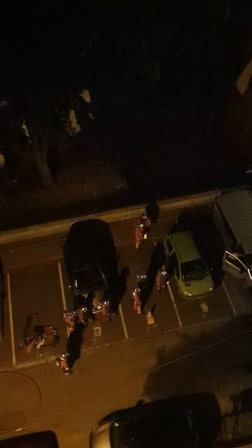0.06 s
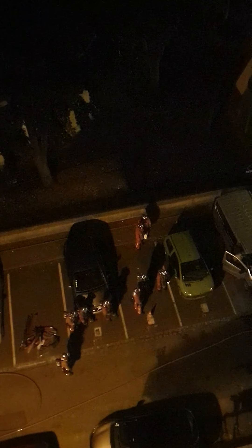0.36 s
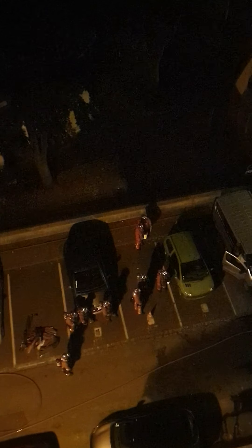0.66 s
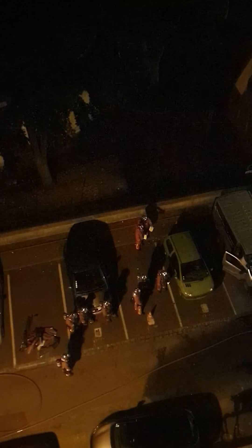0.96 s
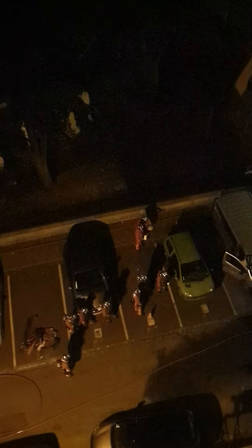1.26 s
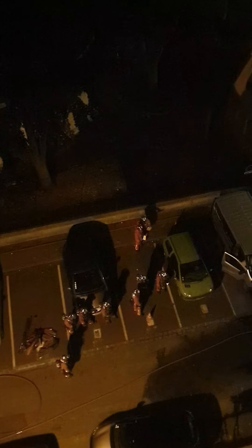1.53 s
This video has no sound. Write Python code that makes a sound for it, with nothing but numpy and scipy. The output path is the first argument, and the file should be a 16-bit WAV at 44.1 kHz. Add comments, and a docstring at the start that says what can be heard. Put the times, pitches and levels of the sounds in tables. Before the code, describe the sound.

Six loud blows on a burnt-out car's steel shell echo between buildings, with small clinks of debris over a low town hum.

```python
"""Six blows on the shell of a burnt-out car, at night, the microphone at a window high above the street.
Three dull, heavy ones make whole panels boom; three hard ones crash on bare steel. Each time the steel
buckles and rings and charred paint cracks off; loose bits clink in between. Every blow rolls around
the house fronts and comes back from all sides, over the low hum of the town."""
import sys
import numpy as np
from scipy import signal
from scipy.fft import rfft, irfft, next_fast_len
from scipy.io import wavfile
from scipy.ndimage import map_coordinates

SR = 44100
rng = np.random.default_rng(int(sys.argv[2]) if len(sys.argv) > 2 else 0)


def store_wav(level_fs):
    """Save 16-bit WAV to argv[1]."""
    pcm = np.round(np.clip(np.atleast_2d(level_fs), -1, 1) * 32767)
    wavfile.write(sys.argv[1], SR, pcm.T.astype(np.int16))


N = 246519

# Blows and rebounds. Each row: start in seconds, level in dB, hardness from 0 to 1, boom pitch in Hz,
# then hollowness, treble and paint grit in dB.
BLOWS = [(0.6232, 23, 0.1, 122, 1, 1.5, -64), (0.634, 22.5, 0.24, 206, 3.5, -15, -70),
         (1.145, 22, 0.03, 113, 4.5, 4, -58), (1.21, 18, 0.09, 218, -5, -2, -61),
         (1.717, 21, 0.15, 98, 3.5, 3.5, -53.5), (1.798, 14.5, 0.01, 120, -1.5, 1.5, -65),
         (3.221, 26.5, 0.97, 62, -2, -2, -54), (4.1799, 22, 0.8, 156, -2.5, 1, -49),
         (4.205, 23, 0.8, 83.5, -2.5, -4.5, -42.5), (5.1545, 25, 0.98, 208.6, 5.5, 9, -43.5)]
# Loose bits. Each row: start in seconds, level in dB, treble in dB.
BITS = [(0.468, -14, 23), (1.013, -6.5, 14.5), (1.06, -18, 25), (1.638, -32, 9), (3.463, -10, -6),
        (3.702, -17, 23), (4.85, -1.5, 7), (5.414, -10, 6), (5.532, -8, 25), (5.555, 0, 9)]
# The shell's tone under a soft and a hard contact. Each row: frequency in Hz, gain in dB.
SOFT_TONE = [(25, -41), (55, 7.5), (110, 3.5), (210, 8), (340, 1.5), (700, 3), (1200, 1.5), (1750, -4.5),
             (2300, -16), (3200, -18), (4500, -31), (7000, -39), (10500, -36.5), (14500, -63)]
HARD_TONE = [(25, -35), (65, 7.5), (115, 4.5), (190, 7), (280, -1), (390, 0), (520, -3.5), (750, 0.5),
             (1130, 3.5), (1480, 1.5), (1850, 1), (2300, -3.5), (3200, -5.5), (4300, -17.5), (7500, -34),
             (11000, -37), (14500, -79)]
# Where a contact's treble and hollowness act. Each row: frequency in Hz, share of the dB setting.
TREBLE_SHARE = [(2500, 0.075), (5500, 0.88)]
HOLLOW_SHARE = [(220, 0.017), (320, 0.45), (480, 0.55), (700, 0)]
# Resonances of the steel. Each row: frequency in Hz, relative level in dB, T60 in seconds.
PANEL_MODES = [(129, -26, 0.15), (209, 8.5, 0.44), (302, -3, 0.64), (410.8, 5, 0.34), (494.5, 3, 0.21),
               (683.7, 9.5, 0.19), (747.4, 9, 0.23), (966, -10, 0.33), (1138, 7, 0.029), (1262, 6.5, 0.2),
               (1420, -15, 0.15), (1784, 11, 0.23), (1880, 6.5, 0.15), (2490, 7, 0.24), (2670, -6, 0.058),
               (2700, 3, 0.11), (2904, 12.5, 0.13), (2883, 10.5, 0.12), (3204, 9.5, 0.12)]
# The street's reverberation. Each row: frequency in Hz, T60 in seconds.
STREET_T60 = [(60, 2.39), (170, 1.18), (500, 1.47), (1000, 1.49), (2500, 1.465), (5000, 1.42),
              (12000, 1.18)]
# Its tone up at the window. Each row: frequency in Hz, gain in dB.
STREET_TONE = [(50, -1.5), (150, 2), (260, 0.5), (500, -3), (780, -0.5), (1100, -3.5), (1500, -1),
               (2200, 0), (3000, -1), (4000, 1.5), (7000, 1.5), (12000, -9.5)]
# Echoes off the house fronts. Each row: delay in seconds, level in dB.
FACADE_ECHOES = [(0.06, -15), (0.09, -17.5), (0.211, -17.5), (.26, -21.5)]
# Balance at the two microphone ports, for sound from the car and from all around.
# Each row: frequency in Hz, left minus right in dB.
CAR_BALANCE = [(150, 2), (450, 3.5), (800, 6), (1100, 33), (1500, -2.5), (1800, -25), (2200, 18), (2600, 8),
               (3250, 56), (3650, 17), (4400, -25.5), (5200, 13), (7600, -24), (9500, -2), (13000, -36)]
DIFFUSE_BALANCE = [(150, 1.5), (450, 0), (620, 8), (850, 0), (1150, 8), (1800, -1), (2400, 7.5),
                   (3300, 4.5), (4500, 3), (6300, -11), (7600, -21), (9500, -5), (13000, 9)]
# The car's sound at the ports. Each row: frequency in Hz, phase lead of the left in radians.
CAR_PHASE = [(850, .5), (1150, -1.2), (1550, -2.5), (1850, -6), (2200, -4), (2550, -12), (3100, -18.5),
             (4200, -14), (5500, -19.5), (12000, -26.5)]
# Diffuse sound at the ports. Each row: frequency in Hz, left-right correlation.
DIFFUSE_LIKENESS = [(150, 0.99), (330, 0.9), (520, 0.47), (750, 0.84), (1050, 0.2), (1500, -0.27),
                    (2000, 0.37), (2600, -0.12), (5000, 0.031)]
# The town's spectrum. Each row: frequency in Hz, relative level in dB.
HUM_TONE = [(25, -15), (45, -1.5), (70, 0), (130, -1), (200, -8.5), (290, -5.5), (370, -15), (500, -9),
            (700, -15), (1200, -12), (1800, -17), (2600, -24.5), (3200, -23.5), (4000, -31.5),
            (7000, -41.5), (11000, -39.5), (12500, -50), (14500, -66)]
# Its loudness. Each row: time in seconds, level in dB.
HUM_LEVEL = [(0, -43.5), (2.3, -48), (5.59, -48.5)]

# Hardness shapes a blow; each pair runs from the softest contact to the hardest.
RISE_S, CRUNCH_T60_S = (0.0065, 0.0045), (0.61, 0.19)  # a soft one builds slower and buckles for longer
BOOM_DB, SNAP_DB = (-26.5, -44), (-67, -91)  # and pushes the whole panel; relative to the blow's level
RING_DB, ECHO_DB = (-0.5, 1.5), (0, -4)  # a hard one rings more and has less echo for its level


def blows(boom_spread_db=-11, grit_spread_db=-8):
    """The tool strikes the car down in the street: the direct sound and the house fronts' answer."""
    direct, echo = np.zeros(N), np.zeros((2, N))
    pairs = (RISE_S, CRUNCH_T60_S, BOOM_DB, RING_DB, SNAP_DB, ECHO_DB)
    for start, db, hardness, boom_hz, hollow_db, treble_db, grit_db in BLOWS:
        rise, t60, boom_db, ring_db, snap_db, echo_db = (np.interp(hardness, [0, 1], p) for p in pairs)
        crash, spread = amp(db) * shell(hardness, ring_db, treble_db, rise, t60, hollow_db)
        thud = amp(db + boom_db) * boom(boom_hz)
        flakes = amp(grit_db) * paint_grit()
        snap = amp(db + snap_db) * paint_snap()
        for sound in (crash, thud, flakes, snap):
            add(direct, start, sound)
        outward = spread + amp(boom_spread_db) * thud + amp(grit_spread_db) * flakes[:len(thud)]
        add(echo, start + rise, amp(echo_db) * street(outward))
    return direct, echo


def shell(hardness, ring_db, treble_db, rise, t60, hollow_db=0, spread_ring_db=-8):
    """What the struck body sends up to the window and out over the street; harder is brighter."""
    def tone_db(hz):
        contact = (1 - hardness) * along(SOFT_TONE, hz) + hardness * along(HARD_TONE, hz)
        return contact + treble_db * along(TREBLE_SHARE, hz) + hollow_db * along(HOLLOW_SHARE, hz)

    ring = amp(ring_db) * panel_ring(rise)
    direct = crunch(rise, t60) + ring
    # summed over all directions the slips even out into one smooth pulse
    spread = signal.unit_impulse(len(ring)) + amp(spread_ring_db) * ring
    return np.array([coloured(direct, tone_db), coloured(spread, tone_db)])


def crunch(rise, t60, grain_db=-0.5, touch=0.47, low_hz=140):
    """The tool touches, then the steel buckles in a burst of tiny slips, too small to move much bass."""
    t = np.arange(SR // 3) / SR
    onset = 1 + touch - np.exp(-(t / rise) ** 2)
    buckling = onset * amp(grain_db * wobble(691, len(t)) - 60 * t / t60)
    slips = rng.standard_normal(len(t)) * buckling
    return signal.lfilter(*signal.butter(1, low_hz, "high", fs=SR), slips / np.linalg.norm(slips))


def panel_ring(rise):
    """The panels ring, a little differently for every spot that is struck."""
    t = np.arange(SR // 3) / SR
    ring = np.zeros(len(t))
    for hz, db, t60 in PANEL_MODES:
        strength, detune, phase = rng.uniform(-1.1, 1, 3)
        decay = np.log(1000) / t60
        peak = amp(db + 2 * strength) * 2 * decay / SR  # from resonance height to starting amplitude
        pitch = hz * (1 + 0.0084 * detune)
        ring += peak * np.exp(-decay * t) * np.sin(2 * np.pi * (pitch * t + phase))
    return ring * (1 - np.exp(-(t / rise) ** 2))


def boom(hz, t60=0.069, give_s=0.00464, attack_s=0.0015):
    """A whole panel gives way just after the contact and swings a few times."""
    t = np.maximum(np.arange(SR // 3) / SR - give_s, 0)
    return np.sin(2 * np.pi * hz * t) * amp(-60 * t / t60) * (1 - np.exp(-t / attack_s))


def paint_grit(t60=0.3, grain_db=4, flakes_per_s=350, fall_s=0.39, fall_spread_s=0.11, patter_db=-25):
    """Charred paint cracks off at the contact; single flakes tick down a moment later."""
    t = np.arange(2 * SR // 3) / SR
    crackle = rng.standard_normal(len(t)) * amp(grain_db * wobble(302, len(t)))
    burst = unit(crackle) * amp(-60 * t / t60)
    ticks = unit(rng.standard_normal(len(t)) * (rng.random(len(t)) < flakes_per_s / SR))
    patter = ticks * amp(patter_db) * np.exp(-((t - fall_s) / fall_spread_s) ** 2)
    return 2 * bandpass(burst + patter, low_hz=8500, high_hz=12000)


def paint_snap(t60=0.057):
    """The brittle paint crust breaks at once as the panel gives way under the tool."""
    t = np.arange(SR // 5) / SR
    crack = bandpass(rng.standard_normal(len(t)), low_hz=5000, high_hz=11500)
    return unit(crack) * amp(-60 * t / t60)


def loose_bits(echo_db=-5):
    """Small pieces of the wreck drop and clink: the direct sound and the house fronts' answer."""
    paths = np.zeros((2, N))
    for start, db, treble_db in BITS:
        clink = shell(hardness=0.64, ring_db=1.0, treble_db=treble_db, rise=0.0028, t60=0.18)
        add(paths, start, amp(db) * clink)
    direct, spread = paths
    return direct, amp(echo_db) * street(spread)[:, :N]


def from_car(x):
    """Straight from car to microphone: long waves reach both ports together, short ones the right first."""
    def response(hz):
        left_lead = along(CAR_PHASE, hz) * np.minimum(hz / 800, 1) ** 2
        return port_gains(CAR_BALANCE, hz) * np.exp([[0.5j], [-0.5j]] * left_lead)

    return filtered(x, response)


def street(x, build_s=0.0058, scatter_s=0.044):
    """The house fronts answer: a few smeared echoes within a long tail, as two unrelated signals."""
    size = 4 * SR // 3
    t = np.arange(size) / SR
    hz, frame_s, spectra = signal.stft(rng.standard_normal((2, size)), SR, nperseg=256)
    decay = amp(-60 * frame_s / along(STREET_T60, hz)[:, None])
    tail = signal.istft(spectra * decay, SR, nperseg=256)[1][:, :size]
    tail *= (1 - np.exp(-t / build_s)) * np.sqrt(14 / SR)
    echo_power = sum(amp(db) ** 2 * (t > delay) * np.exp(-abs(t - delay) / scatter_s)
                     for delay, db in FACADE_ECHOES)
    tail += rng.standard_normal((2, size)) * np.sqrt(echo_power / (scatter_s * SR))
    return signal.fftconvolve(x[None], tail, axes=1)


def from_all_around(pair):
    """Two unrelated signals as diffuse sound at the microphone: alike in the bass, not in the treble."""
    def mid_side_gains(hz):
        angle = np.arccos(np.clip(along(DIFFUSE_LIKENESS, hz), -1, 1)) / 2
        return np.array([np.cos(angle), np.sin(angle)])

    mid, side = filtered(pair, mid_side_gains)
    return filtered(np.array([mid + side, mid - side]), lambda hz: port_gains(DIFFUSE_BALANCE, hz))


def town_hum(bass_hz=250, bass_waver_db=2.4, upper_waver_db=0.077):
    """The hum of the streets reaches the window from all sides; its bass wavers."""
    air = from_all_around(rng.standard_normal((2, N)))
    air = unit(filtered(air, lambda hz: amp(along(HUM_TONE, hz))))
    bass = filtered(air, lambda hz: 1 / (1 + (hz / bass_hz) ** 4))
    upper = (air - bass) * amp(upper_waver_db * wobble(5.6, N))
    bass *= amp(bass_waver_db * wobble(8.7, N))
    level_db = np.interp(np.arange(N) / SR, *np.transpose(HUM_LEVEL))
    return amp(level_db) * (upper + bass)


def port_gains(balance, hz):
    """Left and right gains that share the power between the microphone ports."""
    ratio = amp(along(balance, hz))
    return np.array([ratio, np.ones_like(ratio)]) * np.sqrt(2 / (1 + ratio ** 2))


def amp(db):
    """Decibels to gain."""
    return np.exp(np.asarray(db) * (np.log(10) / 20))


def unit(x):
    """x at rms 1."""
    return x / np.sqrt(np.mean(x ** 2) + 1e-20)


def along(points, hz):
    """(Hz, value) points read on a log axis."""
    knots_hz, values = np.transpose(points)
    return np.interp(np.log(hz + 1), np.log(knots_hz + 1), values)


def wobble(rate, size):
    """A smooth random curve, rate knots a second."""
    knots = rng.standard_normal(size // 20 + 4)
    return map_coordinates(knots, [np.arange(size) * rate / SR], mode="mirror")


def bandpass(x, low_hz, high_hz):
    """x through a Butterworth band filter."""
    return signal.sosfilt(signal.butter(2, [low_hz, high_hz], "band", fs=SR, output="sos"), x)


def filtered(x, response):
    """x with its spectrum multiplied by a function of frequency."""
    size = x.shape[-1]
    padded = next_fast_len(size + SR // 10, real=True)
    return irfft(rfft(x, padded) * response(np.fft.rfftfreq(padded, 1 / SR)), padded)[..., :size]


def coloured(x, level_db, size=4096):
    """x through a causal filter whose gain in dB is a function of frequency."""
    cepstrum = irfft(np.log(amp(level_db(np.fft.rfftfreq(size, 1 / SR)))))
    cepstrum[1:size // 2] *= 2  # folding gives minimum phase
    cepstrum[size // 2 + 1:] = 0
    return signal.fftconvolve(x, irfft(np.exp(rfft(cepstrum))))[:len(x)]


def add(track, s, sound):
    """Mix a sound into the track at s seconds."""
    start = round(s * SR)
    track[..., start:start + sound.shape[-1]] += sound[..., :N - start]


def scene():
    """At the window: the wreck below, its echoes from all around, and the town behind."""
    blow, blow_echo = blows()
    clink, clink_echo = loose_bits()
    echo = filtered(from_all_around(blow_echo + clink_echo), lambda hz: amp(along(STREET_TONE, hz)))
    return from_car(blow + clink) + echo + town_hum()


def record(dry, low_hz=42, top_hz=14700):
    """The phone thins the deepest bass, rounds off the highest peaks and keeps nothing above top_hz."""
    thinned = signal.lfilter(*signal.butter(2, low_hz, "high", fs=SR), dry)
    rounded = thinned / (1 + thinned ** 6) ** (1 / 6)
    return filtered(rounded, lambda hz: hz < top_hz)


dry = scene()
out = record(dry)
store_wav(out)
```